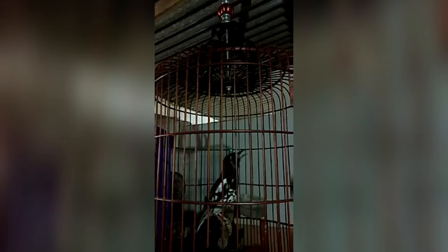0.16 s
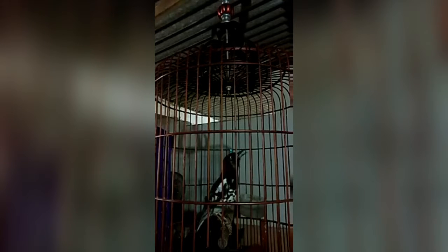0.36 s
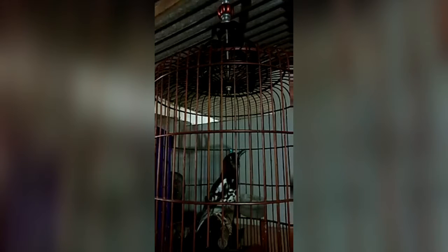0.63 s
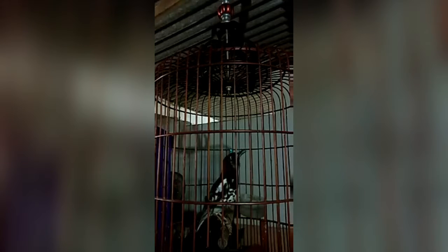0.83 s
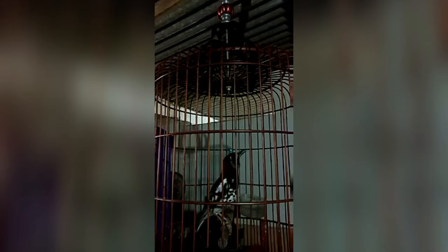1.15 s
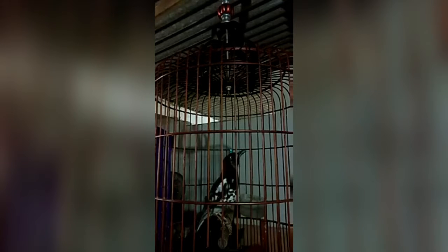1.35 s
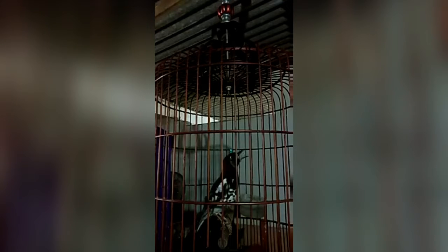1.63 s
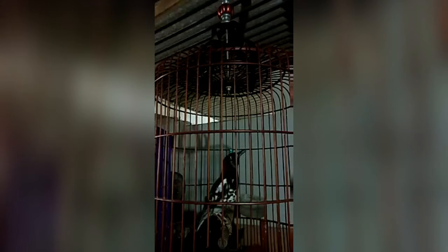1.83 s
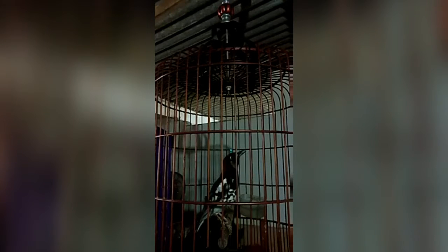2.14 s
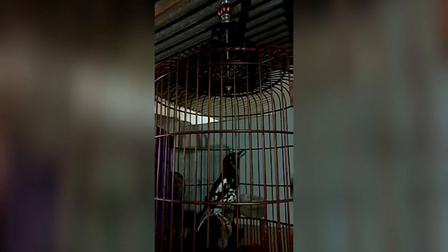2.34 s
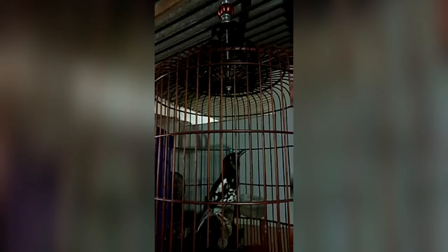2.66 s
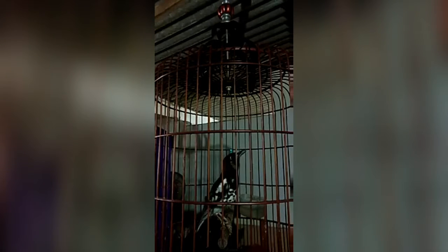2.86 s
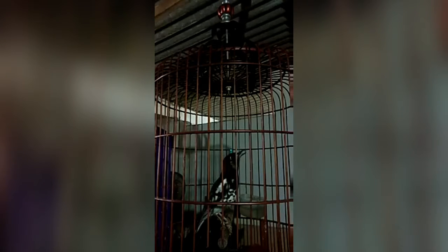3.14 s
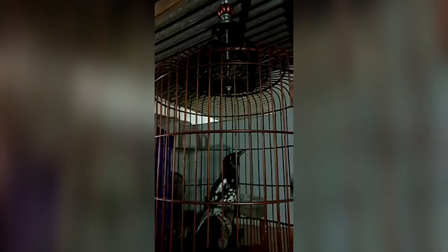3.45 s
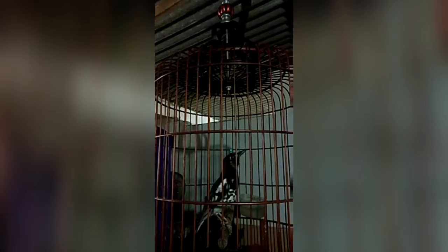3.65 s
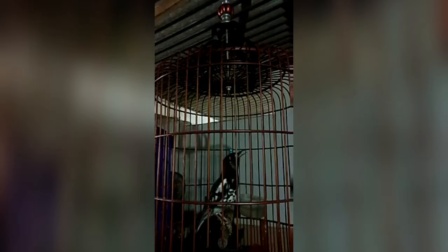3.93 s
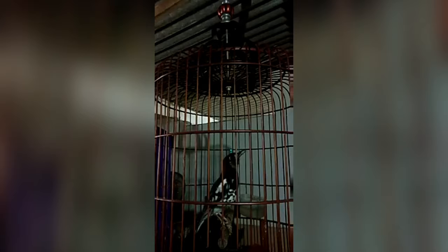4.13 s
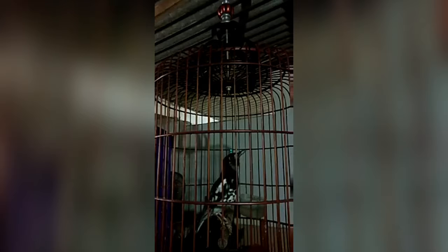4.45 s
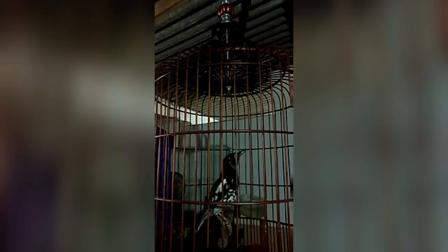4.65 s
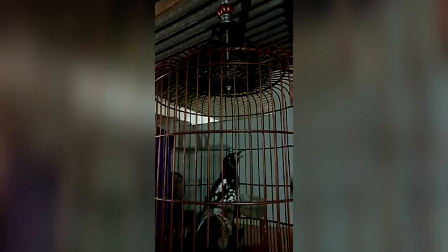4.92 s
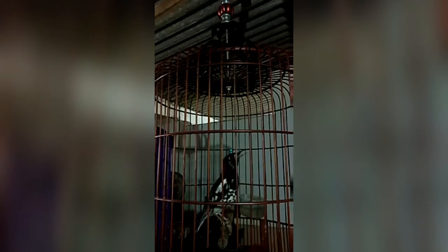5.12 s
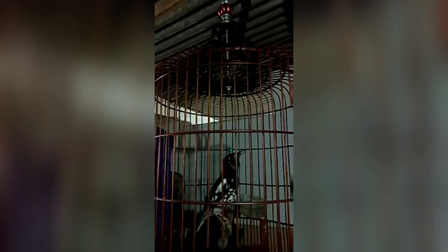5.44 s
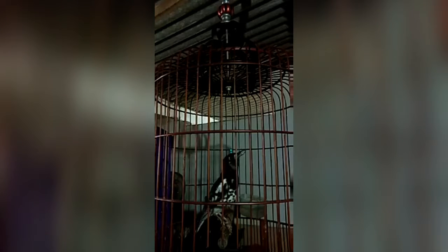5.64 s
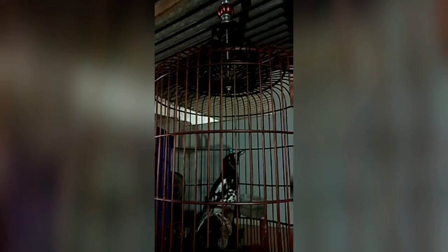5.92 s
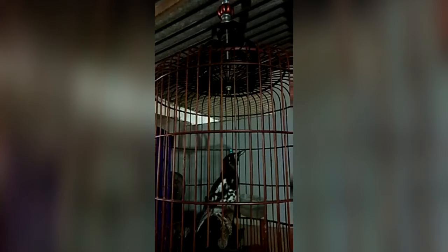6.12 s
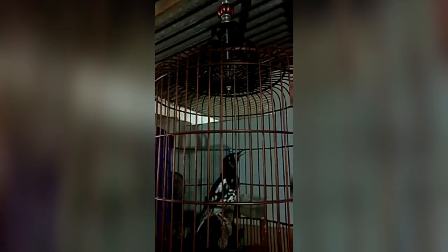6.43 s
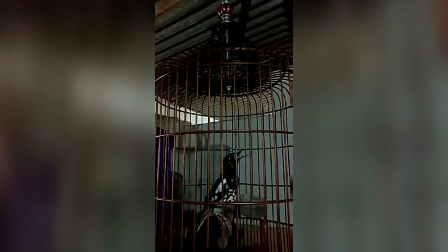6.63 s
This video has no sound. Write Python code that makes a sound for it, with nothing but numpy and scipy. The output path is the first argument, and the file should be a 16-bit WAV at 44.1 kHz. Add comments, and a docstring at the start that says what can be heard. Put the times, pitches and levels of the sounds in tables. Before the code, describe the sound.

One caged thrush sings close to a small stereo recorder in a lively, ringing room. Short whistles dip, climb and warble, then a harsh bright buzz breaks in near two seconds. Longer, clearer whistles follow in separate phrases, then sharp high buzzes crowd together and very high thin squeals end the song. Soft hiss and a distant traffic murmur continue throughout.

```python
"""A caged thrush indoors, close to a small stereo recorder, in a lively room with distant traffic murmuring
throughout. It opens with short whistles that dip, climb and warble, then a harsh buzz near 2 s; longer
whistles settle, swell and scoop until 4.8 s; buzzes crowd in after 5 s, and high ones end the song near 6.7 s.
Whistles are gliding sines, often two at once from the two sides of the voice box; buzzes are tones of randomly
wandering strength and phase. The recorder's crude rate change gives every note faint mirrored ghost tones."""
import sys
import numpy as np
from scipy import signal
from scipy.fft import rfft, irfft, next_fast_len
from scipy.io import wavfile
from scipy.ndimage import uniform_filter1d, map_coordinates

SR = 44100
rng = np.random.default_rng(int(sys.argv[2]) if len(sys.argv) > 2 else 0)


def dump(signal):
    """Clip the signal to [-1, 1] and save it as 16-bit WAV at the path in sys.argv[1]."""
    limited = np.clip(np.atleast_2d(signal).T, -1, 1)
    pcm = np.round(limited * 32767).astype(np.int16)
    wavfile.write(sys.argv[1], SR, pcm)


N = 298998  # samples


def amp(db):
    """Gain of a level in dB."""
    return 10 ** (np.asarray(db) / 20)


def along(points, hz):
    """Values read off (Hz, value) points joined by straight lines on a log frequency axis."""
    point_hz, value = np.transpose(points)
    return np.interp(np.log(hz + 1), np.log(point_hz + 1), value)


def filtered(x, response):
    """Shape the spectrum of x by a gain that is a function of frequency in Hz."""
    size = next_fast_len(N + 8192)
    gain = response(np.fft.rfftfreq(size, 1 / SR))
    return irfft(rfft(x, size) * gain, size)[..., :N]


def drift(rate_hz, order=3):
    """A random curve of rms 1 whose speed (knots a second) is given per sample; order 1 has sharp corners."""
    where = np.cumsum(rate_hz) / SR
    knots = rng.standard_normal(len(where))
    curve = map_coordinates(knots, [where + 2], order=order)
    return curve / np.sqrt(np.mean(curve ** 2))


def note(rows, attack_s, fade_s):
    """Start sample, soft edges and the columns of one note, a value per sample."""
    s, *columns = np.transpose(rows)
    start = round(s[0] * SR)
    t = np.arange(start, round((s[-1] + fade_s) * SR)) / SR
    edge = np.clip(np.minimum((t - s[0]) / attack_s, (t[-1] - t) / fade_s), 0, 1)
    return start, np.sin(edge * np.pi / 2) ** 2, [np.interp(t, s, column) for column in columns]


# Gestures of the longer whistles, by name. Each row: share of the note's length,
# semitones from its pitch, effort in dB.
GESTURES = { "dip": [(0, -2, -6), (.09, -.3, -3), (.19, -6, -5), (.33, -12, -5.5), (.5, -15.5, -6),
            (.64, -13, -5.5), (.74, -5.5, -2), (.88, -3, 0.5), (1, -3, -11)], "climb": [(0, -8, -3),
            (.27, -4, -4), (.55, -1.5, 0), (.78, 0, -1), (1, -0.7, -8.5)], "warble": [(0, 1.8, -2),
            (.2, -.5, -3), (.38, -2, -6), (.52, 1.2, -1), (.65, -1, -3), (.82, -4, -10), (1, -7.5, -20)],
            "settle": [(0, 9.5, -1), (.1, 5, -0.5), (.15, 3.9, 0), (.23, 1.2, -2), (.33, 0, -5),
            (.51, 0, -3.5), (.68, 0.53, -3), (.85, .35, -4), (1, .45, -12)], "settle, rise": [(0, 9.5, -4),
            (.06, 7, -2), (.125, 2.2, 0), (.21, .6, -3), (.4, -.2, -7), (.55, -.5, -4), (.75, .5, -1),
            (.93, 1, -1), (1, .8, -12)], "hold, rise": [(0, -1.2, -15), (.17, 0.5, -8.5), (.42, 0, -8),
            (.6, 0.94, -5), (.75, 2, -0.5), (.87, 3.5, 0), (1, 4, -7.5)], "two swells": [(0, -0.2, -21),
            (.12, -0.33, -6.5), (.23, -0.36, -4.5), (.42, 0.1, -9), (.56, 0.07, -5), (.69, 1.35, -4),
            (.78, 2.5, 1.5), (.87, 4, -2), (1, 5, -14)], "hold, fall": [(0, -1.3, -18), (.1, -.1, -7),
            (.35, 0.38, -4), (.52, .1, 0), (.66, -0.2, .5), (.76, -2.5, -6), (.88, -4.5, -8),
            (1, -7.5, -22)], "scoop": [(0, -12, 0), (.07, -2, 2), (.1, -1, -8), (.125, 0, 2), (.21, -5, 3),
            (.29, -8, -2), (.42, -9.5, -15), (.57, -10, -7), (.7, -8, -6.5), (.83, -6, 3.5), (1, -1.3, -5)],
            "cascade": [(0, -4, -3), (.1, 0, -2), (.17, -3.5, -1), (.27, -8, -1), (.39, -6, 2),
            (.55, -8.7, -.5), (1, -10.5, 0.5)], }
# The longer whistles. Each row: gesture, start in seconds, length in seconds, pitch in Hz,
# level in dB before effort and throat.
LONG_WHISTLES = [ ("dip", .215, .091, 2490, -24), ("dip", .425, .096, 2490, -21.5),
                 ("climb", .677, .036, 2800, -25.5), ("climb", .792, 0.04, 3400, -21),
                 ("climb", .906, .044, 3910, -16.5), ("climb", 1.04, .034, 3870, -18),
                 ("warble", 1.377, .054, 2250, -16.5), ("warble", 1.613, .052, 2200, -17.5),
                 ("settle, rise", 2.39, .127, 2760, -19.5), ("two swells", 2.718, .137, 2680, -15),
                 ("hold, fall", 3.019, 0.142, 2480, -15.5), ("hold, rise", 3.271, .104, 1900, -16),
                 ("hold, fall", 3.553, .128, 2460, -16.5), ("hold, rise", 3.847, .106, 1900, -16),
                 ("settle", 4.269, .136, 2710, -19.5), ("scoop", 4.655, .156, 2800, -22),
                 ("cascade", 5.707, .115, 3490, -24), ]


def long_whistle_curves():
    """Rows of (seconds, pitch in Hz, level in dB) for whistles that bend a named gesture to their pitch."""
    curves = []
    for gesture, start_s, length_s, pitch_hz, level_db in LONG_WHISTLES:
        curves.append([(start_s + share * length_s, pitch_hz * 2 ** (semitones / 12), level_db + effort_db)
                       for share, semitones, effort_db in GESTURES[gesture]])
    return curves


# Short glides with one bend. Each row: start in seconds, seconds to the bend, seconds from bend to end,
# start, bend and end pitch in Hz, level at the bend in dB before the throat.
SHORT_GLIDES = [ (0, .05, .012, 2420, 2463, 2454, -18), (.255, .015, 0.008, 2050, 2200, 2750, -31.5),
                (.468, .012, 0.011, 2140, 2250, 2730, -29), (.66, .021, 0.017, 2250, 2980, 3150, -23.5),
                (.696, .007, .013, 3150, 3100, 2100, -26), (.78, 0.016, .007, 2450, 3200, 4500, -18.5),
                (.895, .01, 0.008, 2650, 3100, 4000, -21), (1.03, .008, 0.007, 2500, 3270, 4000, -24),
                (1.066, .012, 0.023, 3880, 3840, 3820, -20), (1.17, 0.006, 0.029, 2400, 2600, 1450, -23),
                (1.205, 0.015, 0.018, 2500, 2200, 1850, -16.5), (1.236, .007, .014, 2000, 2250, 1550, -25),
                (1.337, 0.008, 0.03, 1800, 3250, 1400, -24), (1.573, 0.007, 0.031, 2000, 2750, 1350, -24.5),
                (2.352, 0.023, 0.013, 1306, 3250, 2150, -25), (2.351, 0.009, 0.006, 2300, 3400, 4500, -30),
                (4.229, 0.022, 0.009, 1000, 3250, 2000, -21.5),
                (4.229, 0.011, 0.005, 2400, 3490, 4400, -25), (4.262, .018, .016, 2650, 2100, 2300, -29),
                (4.4, .03, .06, 2790, 2800, 2790, -29.5), (4.652, 0.0047, 0.0053, 2320, 2530, 3400, -27.5),
                (5.679, .02, .01, 2550, 3150, 3950, -25), (5.68, 0.0125, 0.013, 1250, 1416, 1750, -31),
                (5.874, 0.0057, 0.006, 3170, 3460, 3510, -21),
                (5.888, 0.0052, 0.016, 2740, 3523, 2866, -15.5), (5.906, .012, .027, 3500, 4000, 2127, -21),
                (5.949, 0.007, 0.0202, 2430, 2807, 2025, -19.5),
                (5.984, 0.011, 0.014, 1950, 2400, 1995, -19), ]
GLIDE_IN_DB, GLIDE_OUT_DB = -8, -6  # start and end of a glide, relative to its bend
SAG = .6  # share of a fall after the bend that is done in the first third of its time


def short_glide_curves():
    """Rows of (seconds, pitch in Hz, level in dB) for quick glides that push hardest at one bend."""
    curves = []
    for start_s, first_s, last_s, start_hz, bend_hz, end_hz, level_db in SHORT_GLIDES:
        bend_s = start_s + first_s
        done = SAG if end_hz < bend_hz else 1 / 3  # a fall starts fast, a rise is even
        curves.append([
            (start_s, start_hz, level_db + GLIDE_IN_DB),
            (bend_s, bend_hz, level_db),
            (bend_s + last_s / 3, bend_hz + (end_hz - bend_hz) * done, level_db + GLIDE_OUT_DB / 3),
            (bend_s + last_s, end_hz, level_db + GLIDE_OUT_DB)])
    return curves


# The throat favours some pitches. Each row: pitch in Hz, gain of the whistle in dB.
THROAT = [(1000, -21), (1500, -10), (2200, -1.5), (2800, 0), (4000, -2), (6000, -8.5)]
# The second harmonic. Each row: pitch of the whistle in Hz, overtone in dB relative to the whistle.
OVERTONE = [(2400, -40), (2900, -32), (3850, -24), (4600, -42)]


def whistles():
    """A vibrating membrane: a gliding sine with a weak overtone, fluttering more in fast glides."""
    out = np.zeros(N + SR)
    for rows in long_whistle_curves() + short_glide_curves():
        start, edge, (hz, level_db) = note(rows, attack_s=.007, fade_s=.0045)
        glide_hz_per_s = uniform_filter1d(np.abs(np.gradient(hz)) * SR, SR // 200)
        haste = np.tanh(glide_hz_per_s / 50000)
        shake = .4 * haste * drift(np.full(len(hz), 600.))  # radians
        phase = 2 * np.pi * np.cumsum(hz) / SR + shake
        tone = np.sin(phase) + amp(along(OVERTONE, hz)) * np.sin(2 * phase)
        flutter_db = (.5 + 4.5 * haste) * drift(np.full(len(hz), 400.))
        strength = np.sqrt(2) * amp(level_db + along(THROAT, hz) + flutter_db)
        out[start:][:len(hz)] += strength * edge * tone
    return out[:N]


# The harsh notes, and a few narrow rows that sound as faint overtones of whistles (near 3.28 s and 5.74 s). #
# Each row: start in seconds, swell, hold and fade in seconds, start and end pitch in Hz, # width of the buzz in
# Hz, level of the hold in dB.
BUZZ_NOTES = [ (.68, 0.012, .015, 0.028, 4650, 4750, 2400, -28),
              (.79, .005, .01, .03, 3500, 3300, 2000, -30), (.899, .004, .012, .025, 2800, 3300, 1800, -30),
              (1.032, .012, .012, .025, 3300, 3500, 1800, -27),
              (1.197, .007, 0.003, .004, 3200, 3120, 400, -33),
              (1.363, .007, 0.002, 0.003, 3370, 3200, 394, -37),
              (1.597, 0.007, 0.003, 0.004, 3150, 3110, 400, -34),
              (1.975, 0.013, 0.072, 0.041, 2800, 4400, 2200, -24.5),
              (1.976, 0.036, 0.014, 0.0097, 1888, 2170, 1005, -36.5),
              (1.99, 0.075, 0.025, 0.044, 6850, 7480, 1604, -23),
              (2.021, 0.055, 0.04, .05, 5300, 5900, 1400, -27.5),
              (2.348, .008, .012, .02, 3000, 3300, 2400, -36),
              (2.388, .006, 0.008, 0.028, 3600, 4000, 1500, -25),
              (3.28, .003, 0.011, 0.045, 3880, 3860, 450, -38),
              (3.555, 0.0024, 0.0073, 0.0032, 3463, 3505, 600, -26.5),
              (3.846, 0.0027, .003, 0.011, 3260, 3420, 1200, -33),
              (4.229, .006, .012, .02, 3300, 3500, 2400, -35),
              (4.268, 0.005, .003, .04, 4205, 3924, 1095, -22.5),
              (5.091, .003, 0.0034, 0.035, 5150, 5100, 760, -38),
              (5.119, 0.0029, 0.0037, 0.012, 4900, 6200, 1990, -23.5),
              (5.134, 0.0069, 0.014, 0.0066, 7000, 7150, 1000, -22.5),
              (5.122, .004, 0.17, 0.0069, 3580, 3600, 450, -37),
              (5.239, 0.0037, 0.038, .018, 6650, 7100, 1000, -24),
              (5.315, .04, 0.058, .01, 3800, 3900, 2000, -33.5),
              (5.409, 0.031, 0.011, 0.031, 3797, 3905, 2493, -22.5),
              (5.392, 0.017, 0.0091, .02, 6790, 6640, 836, -26),
              (5.427, .012, 0.0068, 0.028, 6310, 6630, 2396, -25.5),
              (5.689, 0.017, .06, .05, 7530, 6260, 1508, -31),
              (5.705, 0.0043, 0.0043, 0.044, 3300, 3190, 1606, -22),
              (5.74, 0.021, 0.062, 0.0086, 6500, 5460, 404, -31),
              (5.872, .012, .008, .02, 2800, 2900, 2200, -30),
              (5.828, .008, 0.024, 0.017, 4450, 4150, 400, -39),
              (6.481, .003, .015, .05, 6630, 6900, 800, -32),
              (6.506, 0.013, 0.027, .004, 7520, 7640, 548, -23),
              (6.508, .01, 0.055, 0.027, 8650, 8900, 500, -34.5),
              (6.559, .018, 0.066, 0.018, 7770, 7920, 621, -20.5),
              (6.666, 0.013, 0.0099, 0.0026, 7750, 7920, 600, -20),
              (6.67, 0.007, 0.01, 0.0038, 8700, 8900, 496, -31.5), ]
SWELL_DB_PER_S, FADE_DB_PER_S = 220, 289


def buzz_curves():
    """Rows of (seconds, centre Hz, width Hz, level dB): an even glide under a swell, a hold and a fade."""
    curves = []
    for start_s, swell_s, hold_s, fade_s, start_hz, end_hz, width_hz, peak_db in BUZZ_NOTES:
        since_s = np.cumsum([0, swell_s, hold_s, fade_s])
        centre_hz = start_hz + (end_hz - start_hz) * since_s / since_s[-1]
        level_db = peak_db - np.array([SWELL_DB_PER_S * swell_s, 0, 0, FADE_DB_PER_S * fade_s])
        curves.append([(start_s + t, hz, width_hz, db) for t, hz, db in zip(since_s, centre_hz, level_db)])
    return curves


def buzzes():
    """Chaotic beating: strength and phase of the tone wander at random, at a rate equal to the width."""
    out = np.zeros(N + SR)
    for rows in buzz_curves():
        start, edge, (hz, width_hz, level_db) = note(rows, attack_s=.0063, fade_s=.0044)
        phase = 2 * np.pi * np.cumsum(hz) / SR
        ragged_db = 1.6 * drift(np.full(len(hz), 180.))  # the beating comes in irregular bursts
        beat = drift(width_hz, order=1) * np.sin(phase) + drift(width_hz, order=1) * np.cos(phase)
        out[start:][:len(hz)] += amp(level_db + ragged_db) * edge * beat
    return out[:N]


# The right port faces away from the bird. Each row: frequency in Hz, gain of its direct sound in dB.
RIGHT_SHADOW = [(3000, 3), (5000, -10), (8000, -13.5)]
# The beak beams its treble forward, past the walls. Each row: frequency in Hz, gain toward the walls in dB.
TOWARD_WALLS = [(1500, 2), (3000, -1), (5000, -1.5), (8000, -8)]
# Cage roof and near walls. Each row: delay in seconds, left level in dB, right level in dB.
NEAR_ECHOES = [(.0021, -28.5, -45), (.0047, -12, -16.5), (.0083, -13, -13), (.0131, -15, -17),
               (.0188, -14.5, -13.5), (.0262, -13.5, -11)]
# How long the room rings. Each row: frequency in Hz, seconds to die away by 60 dB.
RING_TIME = [(1500, 0.42), (2500, 0.45), (4000, 0.51), (8000, 0.59), (15000, 0.069)]


def room(bird):
    """Direct sound, echoes off cage roof and near walls, a diffuse tail made of overlapping random pieces."""
    direct_right = filtered(bird, lambda hz: amp(along(RIGHT_SHADOW, hz)))
    both = np.array([bird, direct_right])
    sideways = filtered(bird, lambda hz: amp(along(TOWARD_WALLS, hz)))
    for delay_s, left_db, right_db in NEAR_ECHOES:
        echo = np.pad(sideways, (round(delay_s * SR), 0))[:N]
        both = both + amp([[left_db], [right_db]]) * echo
    # overlapping half-second pieces, each with its own random tail
    tail, step = np.zeros((2, N + 2 * SR)), SR // 4
    window = signal.windows.hann(2 * step, sym=False)
    padded = np.pad(sideways, (step, 2 * step))
    for start in range(0, N + step, step):
        noise = rng.standard_normal((2, SR * 3 // 4))
        hz, t, spectrum = signal.stft(noise, SR, nperseg=256)
        build_up = 1 - np.exp(-t / .0043)  # far walls answer late
        decay = amp(-60 * t / along(RING_TIME, hz)[:, None])
        answer = signal.istft(spectrum * build_up * decay, SR, nperseg=256)[1]
        answer /= np.linalg.norm(answer[0])
        piece = padded[start:][:2 * step] * window
        part = signal.fftconvolve(piece[None], answer, axes=1)
        tail[:, start:][:, :part.shape[1]] += part
    return both + amp(-3.5) * tail[:, step:][:, :N]


# Colour of the hiss under the song. Each row: frequency in Hz, relative density in dB per Hz.
SIZZLE_COLOUR = [(4000, -14), (5500, 6.5), (8800, -15), (10500, -5), (12200, -12.5), (13500, -16),
                 (15500, -26)]


def sizzle(song):
    """A treble hiss rises and falls with the song, most with its notes between 3 and 7 kHz."""
    def bright_band(hz):
        rise = (hz / 3600) ** 5
        return rise / (1 + rise) / (1 + (hz / 7000) ** 6)

    bright = filtered(song, bright_band)
    strength = np.sqrt(np.abs(uniform_filter1d(bright ** 2, round(.0083 * SR), axis=1)))
    hiss = filtered(rng.standard_normal((2, N)), lambda hz: amp(along(SIZZLE_COLOUR, hz)))
    return amp(-11.5) * strength * hiss / np.std(hiss)


# Steady air ahead of the microphone ports. Each row: frequency in Hz, density in dB per Hz.
AIR = [(25, -104), (60, -114), (125, -92), (180, -80), (290, -83), (380, -77.5), (520, -85), (1500, -83.5),
       (3800, -77), (6000, -84), (10500, -91), (13500, -100), (15500, -107)]
# How alike the two sides are. Each row: frequency in Hz, left-right correlation from 0 to 1.
ALIKE = [(60, 1), (290, 0.91), (640, 0.87), (1400, 0.37), (3100, 0.19), (7000, 0.0064)]
# Slow swells; only the difference from the last row counts. Each row: time in seconds,
# level of the low murmur in dB, level of the middle hiss in dB.
AIR_SWELL = [(0, -52, -58), (.6, -48, -51.5), (1.8, -52.5, -48.5), (2.6, -56, -46), (3.4, -52, -52),
             (4.199, -56.5, -57), (6.78, -55, -54)]


def background():
    """Air and microphone hiss, alike on both sides only in the bass; murmur and middle hiss swell slowly."""
    def mid_and_side(hz):
        angle = np.arccos(np.clip(along(ALIKE, hz), -1, 1)) / 2
        return amp(along(AIR, hz)) * np.sqrt(SR / 2) * np.array([np.cos(angle), np.sin(angle)])

    mid, side = filtered(rng.standard_normal((2, N)), mid_and_side)
    air = np.array([mid + side, mid - side])
    murmur = filtered(air, lambda hz: 1 / (1 + (hz / 600) ** 4))
    middle = filtered(air, lambda hz: 1 / (1 + (hz / 6500) ** 8) / (1 + (2800 / (hz + 1)) ** 8))
    s, *levels_db = np.transpose(AIR_SWELL)
    t = np.arange(N) / SR
    murmur_gain, middle_gain = [amp(np.interp(t, s, db - db[-1])) for db in levels_db]
    return air + murmur * (murmur_gain - 1) + middle * (middle_gain - 1)


def scene():
    """The bird in its room, the hiss that follows it, and the background."""
    song = room(whistles() + buzzes())
    return song + sizzle(song) + background()


# The two microphone ports differ. Each row: frequency in Hz, left minus right in dB.
PORT_BALANCE = [(200, 0), (700, 1), (2400, -1.5), (4400, -1.5), (8000, 7), (15000, 24)]
# Colour of the top after the rate change. Each row: frequency in Hz, gain in dB.
TREBLE_LIFT = [(7500, .5), (8700, 1), (9800, 6), (11300, 5), (12300, -2.5), (13500, 6.5), (15500, 0.5)]
# That colour favours the left channel. Each row: frequency in Hz, left minus right in dB.
LIFT_BALANCE = [(9000, .5), (12000, 1.5), (15000, 3)]
CAPTURE_RATE = 47990  # samples a second before the rate change
TOP_HZ = 15780  # band limit


def record(dry):
    """Unequal microphone ports, a rate change that picks the nearest sample, a coloured top, a band limit."""
    halves = np.array([[.5], [-.5]])  # split a left-right difference evenly
    ports = filtered(dry, lambda hz: amp(along(PORT_BALANCE, hz) * halves))
    seconds = N // SR + 1
    captured = irfft(rfft(ports, SR * seconds), seconds * CAPTURE_RATE) * CAPTURE_RATE / SR
    # the timing error is a sawtooth at the difference of the two rates:
    # it mirrors each tone around multiples of that difference
    nearest = np.round(np.arange(N) * CAPTURE_RATE / SR).astype(int)
    picked = captured[:, nearest]

    def top(hz):
        return amp(along(TREBLE_LIFT, hz) + along(LIFT_BALANCE, hz) * halves) * (hz < TOP_HZ)

    return filtered(picked, top)


dry = scene()
out = record(dry)
dump(out)
```